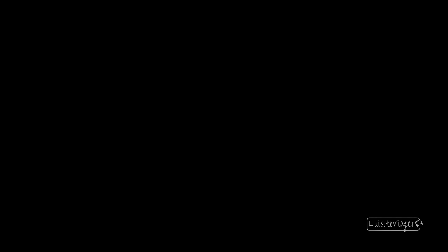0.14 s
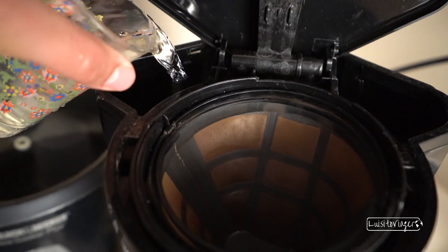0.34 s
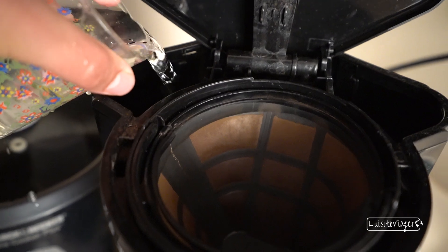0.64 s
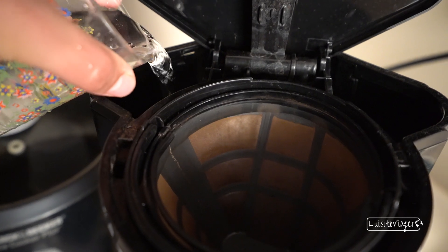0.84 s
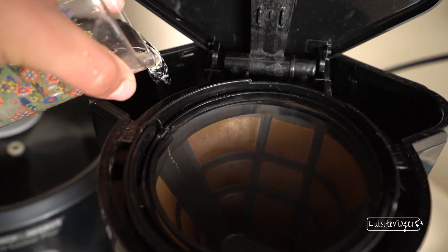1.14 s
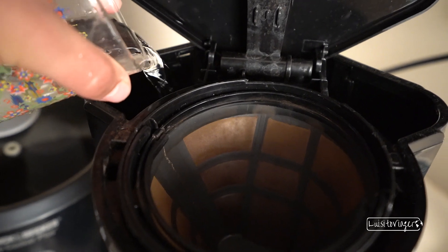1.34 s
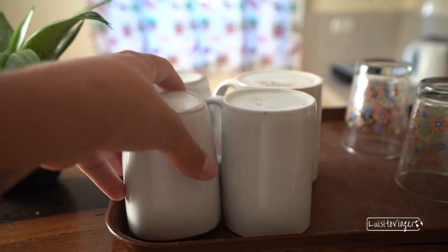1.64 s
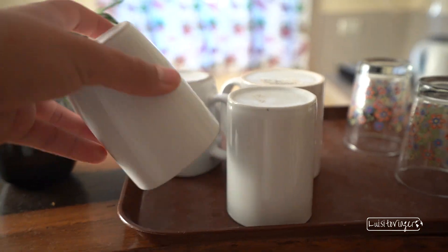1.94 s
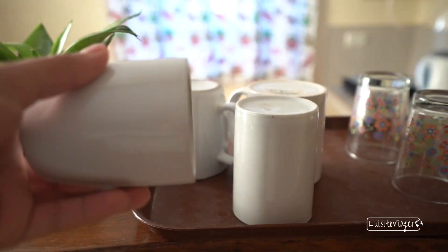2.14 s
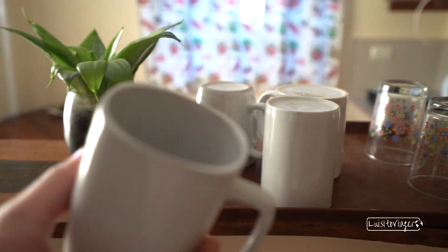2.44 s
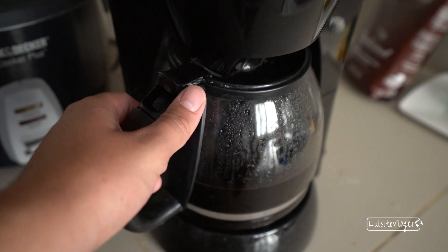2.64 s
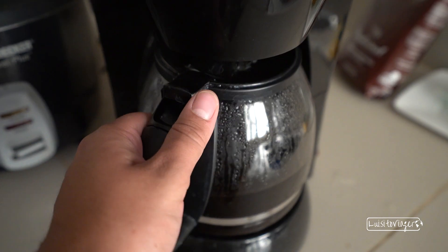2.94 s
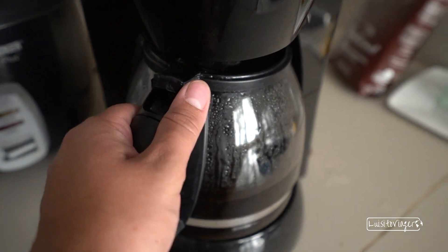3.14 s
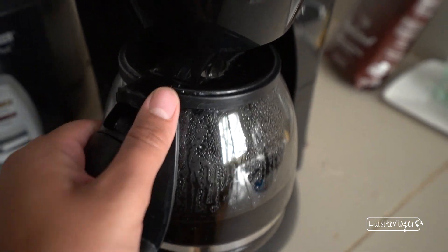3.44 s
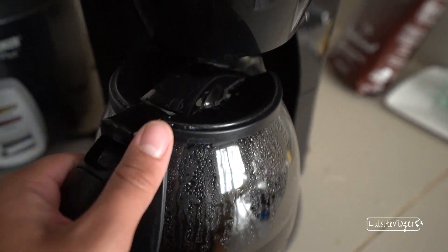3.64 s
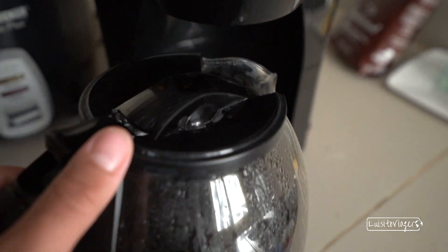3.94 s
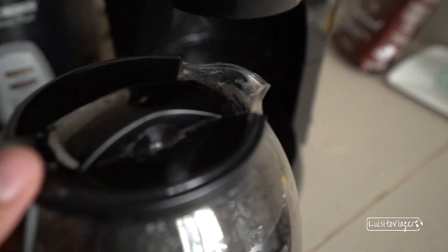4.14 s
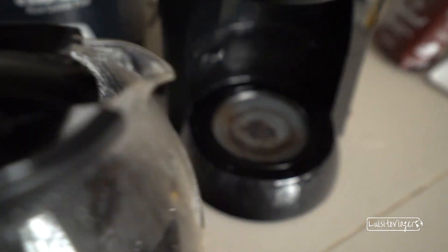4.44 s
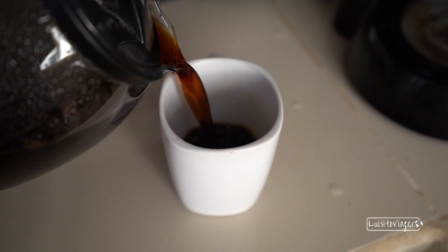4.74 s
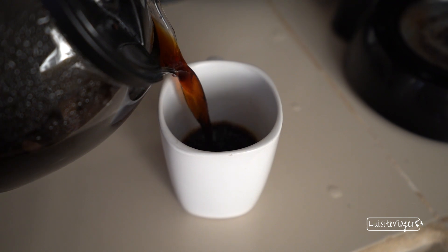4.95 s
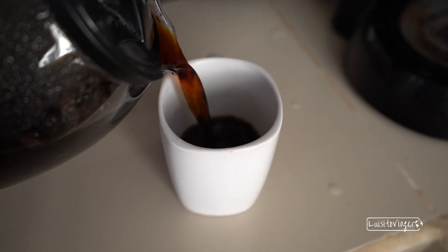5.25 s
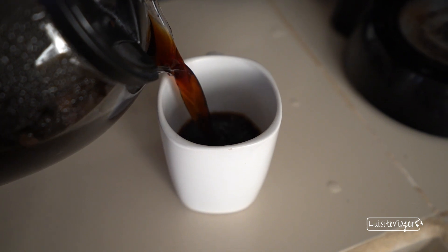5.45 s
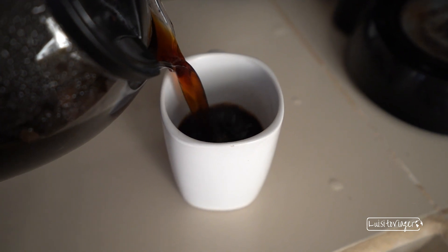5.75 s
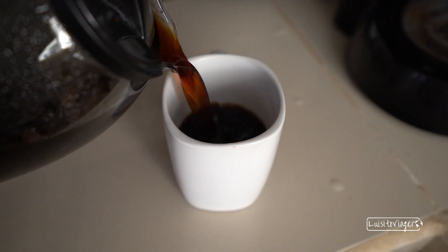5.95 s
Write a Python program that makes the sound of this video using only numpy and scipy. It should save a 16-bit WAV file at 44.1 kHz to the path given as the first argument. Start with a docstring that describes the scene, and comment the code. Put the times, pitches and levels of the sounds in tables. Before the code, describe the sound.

Close bubbling water fills a coffee maker, a mug grates faintly, glass scrapes and thumps in plastic housing, then quiet coffee bubbles into a cup.

```python
"""Water gurgles, sprays and drums into a coffee maker's plastic tank: bubbles ring its air, drops smack its wall.
A mug then grates on its neighbour; a glass carafe judders over the hotplate and knocks its hollow housing.
Last, coffee gushes and bubbles into the mug while something clanks across the quiet kitchen.
Bubbles are chirped decaying sines, solid bodies are struck modes, rubbing and air are coloured noise.
Air and a low draught lie underneath; an appliance hum joins as the carafe starts to slide."""
import sys
import numpy as np
from scipy import signal
from scipy.fft import rfft, irfft, next_fast_len
from scipy.io import wavfile
from scipy.ndimage import map_coordinates

SR = 44100
rng = np.random.default_rng(int(sys.argv[2]) if len(sys.argv) > 2 else 0)


def master_out(mix):
    """Clip the mix to full scale and print it as 16-bit PCM to the path in sys.argv[1]."""
    frames = np.transpose(np.atleast_2d(mix))
    ceiling = np.clip(frames, -1, 1)
    pcm = np.round(ceiling * 32767).astype(np.int16)
    wavfile.write(sys.argv[1], SR, pcm)


N = 269451
TOP_HZ = 16000
FILLING_S, SLIDING_S, POURING_S = (0.387, 1.653), (2.722, 4.02), (4.76, 6.11)  # (start, end)


def amp(db):
    """Decibels to gain."""
    return 10 ** (np.asarray(db) / 20)


def unit(x):
    """Scale to rms 1."""
    return x / np.sqrt(np.mean(x ** 2) + 1e-20)


def along(points, hz):
    """Interpolate (frequency [Hz], value) points on a log axis."""
    f, v = np.transpose(points)
    return np.interp(np.log(hz + 1), np.log(f + 1), v)


def curves(rows):
    """One value per sample for each column after the time [s]."""
    s, *cols = np.transpose(rows)
    return [np.interp(np.arange(N) / SR, s, c) for c in cols]


def between(start, end):
    """1 inside a span [s], 0 outside, with 1 ms edges."""
    t = np.arange(N) / SR
    return np.clip(np.minimum(t - start, end - t) * 1000, 0, 1)


def wobble(rate):
    """Smooth random curve, rate knots per second."""
    knots = rng.standard_normal(int(N * rate / SR) + 4)
    return map_coordinates(knots, [np.arange(N) * rate / SR])


def filtered(x, response):
    """x times a complex response of frequency."""
    m = next_fast_len(len(x) + SR // 2)
    return irfft(rfft(x, m) * response(np.fft.rfftfreq(m, 1 / SR)), m)[:len(x)]


def noise(spectrum, size=N):
    """Coloured noise of rms 1."""
    return unit(filtered(rng.standard_normal(size), lambda hz: amp(along(spectrum, hz))))


def coloured(x, spectrum, size=2048):
    """x through a causal minimum-phase filter, which keeps attacks sharp."""
    gain = amp(along(spectrum, np.fft.rfftfreq(size, 1 / SR)))
    cepstrum = irfft(np.log(gain + 1e-6))
    causal = np.r_[cepstrum[0], 2 * cepstrum[1:size // 2]]
    response = irfft(np.exp(rfft(causal, size)))
    return signal.fftconvolve(x, response)[:len(x)]


def add(track, s, sound):
    """Mix a sound into a track at time s."""
    part = track[max(0, round(s * SR)):][:len(sound)]
    part += sound[:len(part)]


def fade(t60):
    """Half a second of exponential decay."""
    return amp(-60 * np.arange(SR // 2) / SR / t60)


def ring(modes, scatter_db):
    """Sum of decaying modes, struck at new strengths each time."""
    t = np.arange(SR // 2) / SR
    out = np.zeros(len(t))
    for hz, db, t60 in modes:
        gain = amp(db + scatter_db * rng.standard_normal())
        out += gain * fade(t60) * np.sin(2 * np.pi * hz * t)
    return out


def bubble(t, hz, t60, rise):
    """Pulsing air pocket; pitch climbs by the fraction rise per t60 as it nears the surface."""
    age = np.minimum(t / t60, 2)
    envelope = amp(-60 * t / t60) * (1 - np.exp(-4 * hz * t))
    return envelope * np.sin(2 * np.pi * hz * t * (1 + rise * age / 2))


def enclosed(x, t60, wet_db):
    """x plus the dense quick reflections inside a small vessel."""
    tail = fade(t60) * rng.standard_normal(SR // 2)
    tail[:SR // 1000] = 0  # first echo after 1 ms
    return x + amp(wet_db) * signal.fftconvolve(x, tail / np.linalg.norm(tail))[:len(x)]


def swarm(span, rate, centre_hz, spread, cycles, size_db=0, rise=0, size=400):
    """Tiny random bubbles of scattered pitch and life; size_db skews strengths; rms 1 over the span."""
    start, end = span
    when, pitch, strength, life = rng.random((int(rate * (end - start)), 4)).T
    hz = centre_hz * np.exp(spread * np.log(pitch / (1 - pitch)) / 2)[:, None]  # logistic spread
    gain = amp(-size_db * np.log(np.maximum(strength, .04)))[:, None] * (hz < TOP_HZ)
    t60 = np.minimum(cycles * (.5 + life[:, None]) / hz, size / SR)
    grains = gain * bubble(np.arange(size) / SR, hz, t60, rise)
    where = ((start + when * (end - start)) * SR).astype(int)[:, None] + np.arange(size)
    track = np.bincount(where.ravel(), grains.ravel(), N)[:N]
    return unit(track) * np.sqrt((end - start) * SR / N)


def scattered(span, rate, middle_db, scatter_db, middle_hz=1, spread=0):
    """Rows (time [s], level [dB], pitch [Hz]) of like events at uneven intervals."""
    slots = np.arange(*span, 1 / rate)
    late, strength, pitch = rng.standard_normal((len(slots), 3)).T
    levels = middle_db + scatter_db * strength
    return zip(slots + .35 * late / rate, levels, middle_hz * np.exp(spread * pitch))


# tank air resonances: (frequency [Hz], width [Hz], level [dB])
TANK_MODES = [(1207, 62, -1), (1390, 160, -4.5), (1897, 120, 5.5), (2010, 88, -5), (2540, 72, 2.5)]
# spray and splash spectrum: (frequency [Hz], level [dB])
SPRAY_SPECTRUM = [(1290, -25), (2200, -15.5), (2450, -0.5), (5130, -2), (5910, -8.5), (8370, -6),
                  (10200, -15), (13100, -13.5), (16000, -31)]
# drumming tank wall spectrum: (frequency [Hz], level [dB])
WALL_SPECTRUM = [(35, -6.5), (65, 2), (100, 4), (130, 3), (185, -9), (260, 2), (370, -5), (520, 0.5),
                 (750, -10.5), (1100, -10.5), (2000, -25)]
# biggest tank bubbles: (time [s], level [dB], starting pitch [Hz])
TANK_BUBBLES = [(0.389, -22.5, 3400), (.553, -35, 4100), (.591, -21.5, 2887), (.6935, -28, 3170),
                (0.869, -27.5, 2290), (0.94, -26, 1203), (.978, -18.5, 4100), (1.084, -24.5, 1970),
                (1.097, -26, 1209), (1.143, -21.5, 7000), (1.212, -30.5, 3400), (1.250, -25, 4000),
                (1.260, -21, 1917), (1.276, -24, 1168), (1.281, -20.5, 1920), (1.285, -23.5, 2500),
                (1.347, -26, 3880), (1.362, -25, 1880), (1.493, -28, 1950), (1.539, -21, 1816),
                (1.570, -29.5, 1640), (1.589, -22.5, 1212), (1.616, -17, 4530), (1.6355, -12.5, 4220),
                (1.636, -22.5, 1380), (1.643, -26.5, 1756), (1.647, -27.5, 1217)]
# drops smacking the plastic: (time [s], relative level [dB])
DROP_SMACKS = [(0.392, -34), (.669, -24), (.924, -24.5), (1.077, -26.5), (1.114, -16), (1.319, -22.5),
               (1.614, -35)]
# strength of the stream into the tank: (time [s], level [dB])
STREAM_FLOW = [(0.39, -6.5), (0.57, -8), (0.67, -4.5), (0.73, -5), (0.93, -0.5), (1.12, -1), (1.4, -0.5),
               (1.52, -3), (1.65, 2.5)]
SPRAY_DB, GURGLE_DB, DRUM_DB = -46.5, -48, -48.5  # at 0 dB flow
GURGLE_DB_PER_FLOW_DB, DRUM_DB_PER_FLOW_DB = 2.4, 0.45
T60_AT_1KHZ_S, T60_PITCH_POWER = 0.1, 1.53  # smaller bubbles die sooner


def tank_filling():
    """Stream entrains bubbles that ring the tank's air; drops smack and drum on its wall."""
    flow_db, = curves(STREAM_FLOW)

    def cavity(f):
        return sum(amp(db) * 1j * f * w / (c * c - f * f + 1j * f * w) for c, w, db in TANK_MODES)

    trapped = swarm(FILLING_S, rate=700, centre_hz=1737, spread=0.42, cycles=13, size_db=4.5)
    trapped = unit(filtered(trapped, cavity))
    # free bubbles keep their own pitch
    free = swarm(FILLING_S, rate=1200, centre_hz=2220, spread=0.4, cycles=62, size=800)
    gurgle = unit(trapped + 0.77 * free)

    bursts = swarm(FILLING_S, rate=2100, centre_hz=8010, spread=0.615, cycles=80, size_db=2.5)
    mist = unit(rng.standard_normal(N) * amp(1.7 * wobble(300)))
    spray = coloured(enclosed(bursts, t60=0.019, wet_db=-7) + 0.89 * mist, SPRAY_SPECTRUM)
    spray = unit(spray * amp(3.3 * wobble(70)))  # stream breaks up in clumps
    drumming = unit(noise(WALL_SPECTRUM) * amp(2.2 * wobble(60)))

    water = amp(GURGLE_DB + GURGLE_DB_PER_FLOW_DB * flow_db) * gurgle
    water += amp(SPRAY_DB + flow_db) * spray
    water += amp(DRUM_DB + DRUM_DB_PER_FLOW_DB * flow_db) * drumming

    def flow_at(s):
        return np.interp(s, *np.transpose(STREAM_FLOW))

    # lesser bubbles and spatter, levels at 0 dB flow
    lesser = scattered(FILLING_S, rate=36, middle_db=-35, scatter_db=2.5, middle_hz=1896, spread=.3)
    small = [(s, db + GURGLE_DB_PER_FLOW_DB * flow_at(s), hz) for s, db, hz in lesser]
    drops = scattered(FILLING_S, rate=45, middle_db=-35.5, scatter_db=3)
    spatter = [(s, db + flow_at(s)) for s, db, _ in drops]

    t = np.arange(SR // 4) / SR
    for s, db, hz in [*TANK_BUBBLES, *small]:
        t60 = T60_AT_1KHZ_S * (1000 / hz) ** T60_PITCH_POWER
        splash = 0.22 * amp(-60 * t / 0.029) * noise(SPRAY_SPECTRUM, size=len(t))
        glug = bubble(t, hz, t60, rise=0.034) + splash
        add(water, s, amp(db) * enclosed(glug, t60=0.18, wet_db=-5))
    smack_spectrum = [(1500, -20.5), (4000, -3.5), (9000, -2.5), (13000, -0.5), (16000, -10)]
    for s, db in [*DROP_SMACKS, *spatter]:
        smack = fade(0.0034) * noise(smack_spectrum, size=SR // 2)
        add(water, s, amp(db + 2.5) * enclosed(smack, t60=0.027, wet_db=-1))
    return water * between(*FILLING_S)


# carafe striking its housing: (time [s], relative body level [dB], relative crack level [dB])
CARAFE_KNOCKS = [(2.725, -35, -50), (2.87, -27, -55), (2.938, -29, -35), (2.967, -21.5, -41),
                 (2.978, -22, -58), (3.02, -25.5, -35), (3.119, -41, -18.5), (3.184, -25, -24),
                 (3.247, -37, -39.5), (3.309, -33, -44), (3.4127, -19, -17), (3.416, -22, -14.5),
                 (3.418, -8.5, -25), (3.4262, -13.5, -36), (3.4321, -14.5, -40), (3.451, -28, -32),
                 (3.509, -33, -52), (3.607, -21.5, -31), (3.6094, -13.5, -18), (3.647, -42, -31),
                 (3.708, -31, -31), (3.758, -28, -32), (3.778, -24, -40), (3.824, -35, -46),
                 (3.879, -37, -31.5)]
# modes of the housing with the carafe in it: (frequency [Hz], level [dB], t60 [s])
HOUSING_MODES = [(231, -11, .11), (288, -13, .08), (368, 0, .115), (395, -8, .08), (465, -11, .07),
                 (521, -6, .09), (590, -13, .07), (742, -14, .08), (860, -13, .06), (961, -6, .055),
                 (1140, -10, .05), (1320, -12, .045)]
# crack spectrum: (frequency [Hz], level [dB])
CRACK_SPECTRUM = [(300, 4.5), (900, 11), (1400, 6.5), (2200, 4.5), (4000, -3), (5200, -13), (8500, -16.5),
                  (13000, -58), (16000, -48)]
# carafe sliding on the hotplate: (time [s], judder level [dB], rubbing level [dB])
SLIDE_LEVELS = [(2.73, -55, -56), (3.08, -52.5, -53), (3.28, -47.5, -64), (3.5, -50.5, -58.5),
                (3.65, -44, -60), (3.79, -43, -64), (4.0, -70, -82)]
# judder spectrum: (frequency [Hz], level [dB])
JUDDER_SPECTRUM = [(88, -19.5), (150, -17), (214, -16), (284, -15), (369, -3), (439, -9), (522, -11.5),
                   (601, -22.5), (684, -15), (907, -22.5), (1210, -12.5), (1490, -29), (2000, -17.5),
                   (2600, -68), (4400, -120)]
# rubbing spectrum: (frequency [Hz], level [dB])
RUB_SPECTRUM = [(530, -27), (900, 0), (1310, -3), (1460, -4), (2040, -3), (2330, -5), (2890, -5.5),
                (3960, -7), (5890, -15.5), (8870, -19), (10500, -39.5), (14400, -30), (16000, -33)]
# glass slipping quickly over plastic: (start [s], end [s], level [dB])
GLASS_SWISHES = [(2.746, 3.021, -59.5), (3.637, 3.811, -59.5)]
# lid flicking past the drip valve: (time [s], level [dB])
LID_SNAPS = [(3.116, -43.5), (3.4393, -40), (3.61, -32)]
# radiation of the housing: (frequency [Hz], level [dB])
HOUSING_RADIATION = [(70, -17), (150, -8.5), (220, -1), (1400, -4), (3000, -13)]


def carafe():
    """Glass judders over the hotplate; each catch cracks and booms in the hollow plastic housing."""
    judder_db, rub_db = curves(SLIDE_LEVELS)
    grip = wobble(27.79)  # stick and slip
    catches = swarm(SLIDING_S, rate=360, centre_hz=600, spread=0.67, cycles=1.7, size_db=2)
    judder = unit(coloured(catches, JUDDER_SPECTRUM) * amp(0.88 * grip))
    rub = unit(noise(RUB_SPECTRUM) * amp(2.9 * wobble(160) + 2.3 * grip))
    out = (amp(judder_db) * judder + amp(rub_db) * rub) * between(*SLIDING_S)

    swish_spectrum = [(3000, 14), (8500, 12), (10500, 8), (14000, 11), (16000, -1)]
    for start, end, db in GLASS_SWISHES:
        swish = noise(swish_spectrum, size=round((end - start) * SR))
        add(out, start, amp(db) * np.hanning(len(swish)) * swish)

    boom = np.zeros(N)
    thud_spectrum = [(100, -16), (200, 8), (550, 4.5), (900, -15), (2000, -40)]
    for s, body_db, crack_db in CARAFE_KNOCKS:
        shift = 1 + 0.0097 * rng.standard_normal()  # modes move as the carafe changes its seat
        modes = ring([(hz * shift, db, t60) for hz, db, t60 in HOUSING_MODES], scatter_db=1.9)
        thud = 0.61 * fade(0.127) * noise(thud_spectrum, size=SR // 2)
        add(boom, s, amp(body_db - 9) * (modes + thud))
        crack = (fade(0.029) + 0.38 * fade(0.16)) * noise(CRACK_SPECTRUM, size=SR // 2)
        add(out, s, amp(crack_db - 10) * crack)

    snap_spectrum = [(3000, 10), (8000, 6.5), (13000, -4), (16000, -13)]
    for s, db in LID_SNAPS:
        snap = (fade(0.03) + 0.16 * fade(0.11)) * noise(snap_spectrum, size=SR // 2)
        add(out, s, amp(db) * snap)
    return out + coloured(boom, HOUSING_RADIATION)


# strongest mug bubbles: (time [s], relative level [dB], starting pitch [Hz])
MUG_BUBBLES = [(4.763, -41, 3000), (4.825, -46, 7600), (4.8354, -44, 3250), (4.9249, -39, 6940),
               (5.1407, -42, 3960), (5.1635, -36, 7060), (5.2496, -37.5, 3400), (5.3386, -36.5, 4700),
               (5.3716, -33.5, 3800), (5.3774, -37, 4930), (5.4384, -35, 3480), (5.4813, -36, 4690),
               (5.5078, -37.5, 3070), (5.6045, -36, 4200), (5.6243, -38, 4650), (5.6878, -40, 3350),
               (6.07, -38, 3220)]
# stream plunging into the coffee: (time [s], relative level [dB], starting cavity pitch [Hz])
PLUNGES = [(4.777, -35.5, 1526), (4.789, -40, 1060), (4.807, -32.5, 1020), (4.833, -35, 1085),
           (4.879, -42.5, 1080), (4.939, -37, 1084), (4.957, -45, 1110), (5.154, -40, 1033),
           (5.2, -42, 1120), (5.247, -46, 1210), (5.272, -50, 1110), (6.069, -41, 1470)]
# fizz spectrum, also colours the mug's grating: (frequency [Hz], level [dB])
FIZZ_SPECTRUM = [(800, 0), (1100, 17), (2200, -7), (3500, -2.5), (4800, -9.5), (6300, -17.5), (7500, -1),
                 (9000, -6), (15000, -53)]
# spectrum of the mug's air: (frequency [Hz], level [dB])
BURBLE_SPECTRUM = [(600, -34), (850, -6), (1050, -5), (1300, -4), (1600, -4.5), (2300, -16), (3200, -4),
                   (4500, -30)]
# films bursting on the coffee: (time [s], level [dB])
FILM_POPS = [(4.8354, -32.5), (4.976, -35), (5.609, -42), (5.688, -41), (5.829, -47)]
SETTLED_S, THIN_DB = 5.07, -8  # stream is weaker by THIN_DB until it has dug its hollow
FIZZ_DB, BURBLE_DB = -71.5, -75  # settled stream
GUSH_S, GUSH_ATTACK_S, GUSH_DB, GUSH_FALL_DB_PER_S = 4.778, 0.016, -55, 150
GUSH_FIZZ_DB = -8  # re gush burble


def coffee_pouring():
    """After a first gush, a smooth stream traps single bubbles; deeper plunges ring the mug's air."""
    age = np.arange(N) / SR - GUSH_S
    attack = np.clip(1 + age / GUSH_ATTACK_S, 0, 1)
    gush = attack * amp(GUSH_DB - GUSH_FALL_DB_PER_S * np.maximum(age, 0))
    stream = amp(THIN_DB * (age < SETTLED_S - GUSH_S))
    fizz = swarm(POURING_S, rate=300, centre_hz=4850, spread=0.455, cycles=47, size_db=7.5, rise=.1)
    fizz = unit(coloured(fizz, FIZZ_SPECTRUM))
    burble = swarm(POURING_S, rate=450, centre_hz=1530, spread=0.47, cycles=8, rise=0.11)
    burble = unit(coloured(burble, BURBLE_SPECTRUM))
    out = (amp(FIZZ_DB) * stream + amp(GUSH_FIZZ_DB) * gush) * fizz
    out += (amp(BURBLE_DB) * stream + gush) * burble
    out *= between(*POURING_S)

    t = np.arange(SR // 2) / SR
    for s, db, hz in PLUNGES:
        gulp = bubble(t, hz, 0.034, rise=0.11)
        gulp += 0.59 * bubble(t, 1.66 * hz, 0.0089, rise=.2)
        gulp += 0.46 * bubble(t, 3 * hz, 0.0062, rise=0.17)
        add(out, s, amp(db - 3.5) * enclosed(gulp, t60=0.097, wet_db=-7))
    for s, db in FILM_POPS:
        pop = fade(0.00055) * rng.standard_normal(len(t))
        add(out, s, amp(db) * enclosed(pop, t60=0.032, wet_db=-9))

    lesser = scattered((SETTLED_S, POURING_S[1]), rate=42, middle_db=-47, scatter_db=0,
                       middle_hz=4030, spread=0.26)
    for s, db, hz in [*MUG_BUBBLES, *lesser]:
        overtone = amp(-42 + 6.7 * rng.standard_normal()) * bubble(t, min(3 * hz, 8000), 0.0011, rise=0.077)
        # neck snaps shut
        pinch = amp(-40 + 5 * rng.standard_normal()) * fade(.001) * rng.standard_normal(len(t))
        blip = bubble(t, hz, 15 / hz, rise=0.11) + overtone + pinch
        add(out, s, amp(db + 4.5) * enclosed(blip, t60=0.071, wet_db=-7))
    return out


# glazed ceramic modes: (frequency [Hz], level [dB], t60 [s])
MUG_MODES = [(2710, -6, 0.22), (2950, -5, 0.12), (5140, -7, .11), (6905, -7, 0.066), (7200, -5, 0.048),
             (7784, -12, 0.056), (8460, -11, 0.041)]
# mug grazing mug: (time [s], relative level [dB])
MUG_CLINKS = [(1.692, -47), (1.703, -48.5), (1.714, -42.5), (1.729, -65), (1.821, -61)]


def mug_lifted():
    """The mug's glaze grates briefly on its neighbour; noise bursts excite faint ceramic modes."""
    grating = np.zeros(N)
    for s, db in MUG_CLINKS:
        add(grating, s, amp(db) * fade(0.061) * rng.standard_normal(SR // 2))
    ceramic = ring(MUG_MODES, scatter_db=4)
    ringing = signal.fftconvolve(grating, ceramic / np.linalg.norm(ceramic))[:N]
    return 0.48 * ringing + .5 * coloured(grating, FIZZ_SPECTRUM)


# light taps, and small bumps and scrapes of the sliding carafe:
# (time [s], mean level [dB], pitch [Hz], t60 [s])
TAPS_AND_BUMPS = [(1.821, -51, 2330, 0.0034), (1.835, -47, 780, 0.033), (2.534, -52.5, 2470, 0.014),
                  (2.974, -27.5, 486, 0.048), (3.309, -26, 3140, 0.0031), (3.574, -29, 2630, 0.0035),
                  (3.731, -32, 1980, 0.0049), (3.789, -36.5, 800, 0.073), (4.286, -43.5, 498.5, 0.12)]


def taps_and_bumps():
    """Light taps and small carafe bumps and scrapes, each one short resonance."""
    out = np.zeros(N)
    for s, db, hz, t60 in TAPS_AND_BUMPS:
        contact = ring([(hz, 0, t60)], scatter_db=5.5)
        add(out, s, amp(db) * enclosed(contact, t60=0.027, wet_db=-1))
    return out


# dull clank across the room: (frequency [Hz], mean level [dB], t60 [s])
CLANK_MODES = [(1660, -24, 0.52), (2026, 6, 0.41), (2200, -3, 0.43), (2420, -4, 0.58), (2770, -14, 0.53),
               (3380, -5, 0.37)]


def clank():
    """Something hard is set down further off: struck modes plus decaying clatter noise."""
    out = np.zeros(N)
    clatter_spectrum = [(1000, -14), (1800, 0.5), (2200, 8), (3000, 1.5),
                        (4500, -8), (8000, -9), (10000, -26), (15000, -42)]
    clatter = fade(0.7) * noise(clatter_spectrum, size=SR // 2)
    add(out, 5.83, amp(-56.5) * ring(CLANK_MODES, scatter_db=6) + amp(-52) * clatter)
    return out


# room air spectrum: (frequency [Hz], level [dB])
AIR_SPECTRUM = [(82, -34.5), (140, -5.5), (161, -9), (217, -1.5), (322, -4.5), (342, -3), (408, 0.5),
                (442, -6.5), (770, -9), (1020, -8.5), (1420, -16.5), (4770, -30.5), (16000, -48)]
# draught spectrum: (frequency [Hz], level [dB])
DRAUGHT_SPECTRUM = [(3, -15), (8, -9.5), (12, 3), (16, 0), (22, -21.5), (30, -18), (45, -33.5), (70, -29),
                    (100, -47), (160, -59), (400, -94.5)]
# rustle of the moving arm: (time [s], level [dB])
ARM_RUSTLE = [(1.9, -76.5), (2.35, -74.5), (2.65, -63.5), (4.0, -70), (4.3, -66), (4.7, -77)]
# appliance hum partials: (frequency [Hz], rms level [dB])
HUM_PARTIALS = [(64.6, -65.5), (118.4, -61), (209.9, -75), (349.9, -72), (414.5, -73), (990.5, -74.5)]
# air puffs on the microphone as things move past: (time [s], level [dB])
AIR_PUFFS = [(0.45, -34.5), (0.88, -34.5), (2.47, -32), (3.16, -25), (3.85, -30), (4.499, -24.5),
             (5.62, -31)]
PUFF_SIGMA_S, DRAUGHT_DB = 0.12, -37


def background():
    """Room air, puffing draught, low drone and rustle as coloured noise; hum as phase-wobbled sines."""
    t = np.arange(N) / SR
    rustle_db, = curves(ARM_RUSTLE)
    rustle = amp(rustle_db) * noise([(500, 1), (1500, -1), (7000, -7), (15000, -19)])
    puffs = sum(amp(db) * np.exp(-.5 * ((t - s) / PUFF_SIGMA_S) ** 2) for s, db in AIR_PUFFS)
    draught = (amp(DRAUGHT_DB) + puffs) * noise(DRAUGHT_SPECTRUM)
    drone = amp(-57) * noise([(25, -15.5), (62, -1), (90, -10), (150, -23), (300, -53.5)])
    hum = np.zeros(N)
    for hz, db in HUM_PARTIALS:
        hum += amp(db) * np.sqrt(2) * np.sin(2 * np.pi * hz * t + 0.45 * wobble(8.2))
    air = amp(-61) * noise(AIR_SPECTRUM)
    return air + draught + drone + rustle + hum * between(SLIDING_S[0], N / SR)


# kitchen decay: (frequency [Hz], t60 [s])
KITCHEN_T60 = [(150, 0.24), (1000, 0.36), (4000, 0.25), (12000, 0.38)]


def kitchen(x):
    """Room reverberation: noise tail with frequency-dependent decay, 5 ms late."""
    hz, t, z = signal.stft(rng.standard_normal(SR // 2), SR, nperseg=256)
    decay = amp(-60 * t / along(KITCHEN_T60, hz)[:, None])
    tail = signal.istft(z * decay, SR, nperseg=256)[1]
    response = np.pad(tail / np.linalg.norm(tail), (SR // 200, 0))
    return signal.fftconvolve(x, response)[:N]


def scene():
    """Sum of all sources, the room's answer to handling and coffee, and a silent start."""
    handling = mug_lifted() + taps_and_bumps() + carafe() + clank()
    coffee = coffee_pouring()
    room = kitchen(amp(-10) * handling + amp(-14) * coffee)
    mix = tank_filling() + handling + coffee + room + background()
    return (mix * between(FILLING_S[0], N / SR))[None]


def record(dry):
    """Band limit: nothing passes from TOP_HZ up."""
    return filtered(dry[0], lambda hz: hz < TOP_HZ)[None]


dry = scene()
out = record(dry)
master_out(out)
```